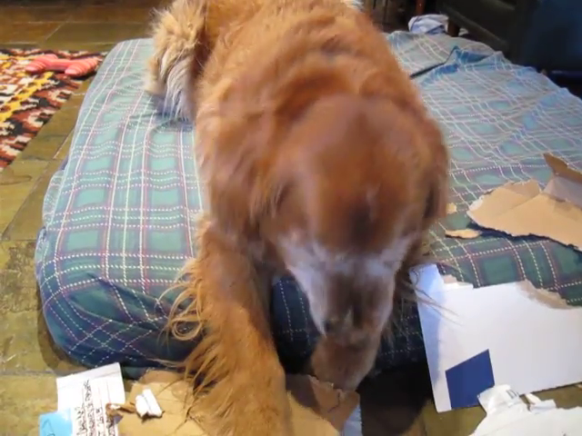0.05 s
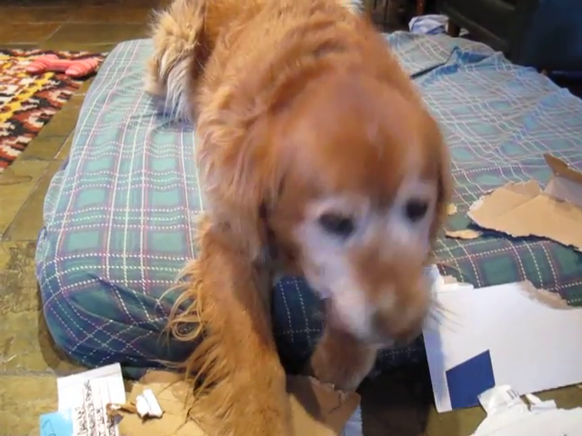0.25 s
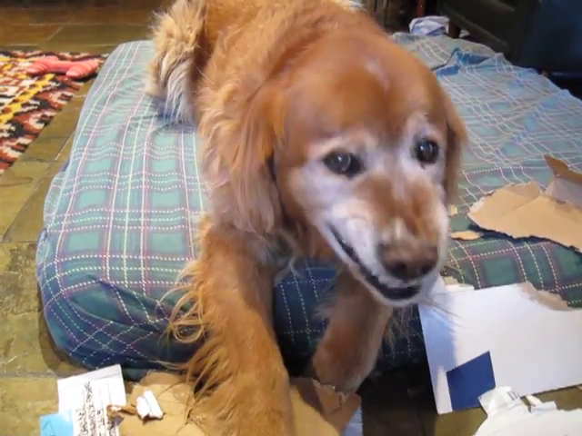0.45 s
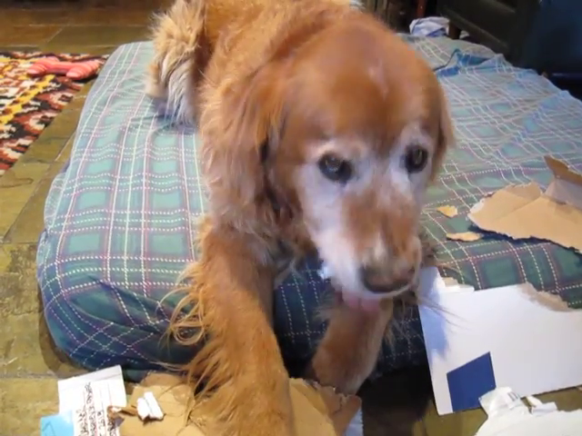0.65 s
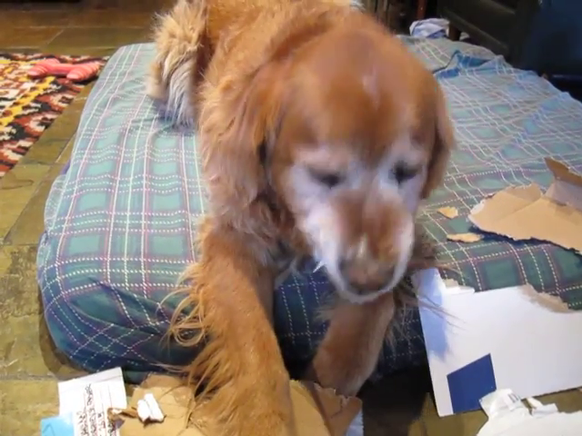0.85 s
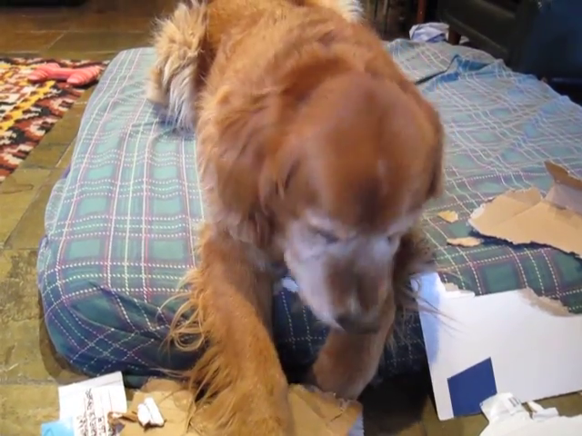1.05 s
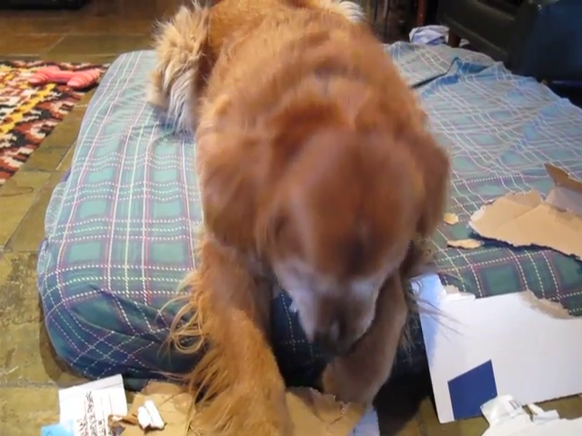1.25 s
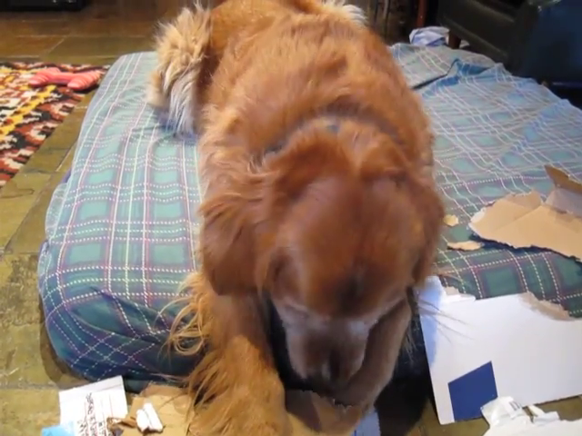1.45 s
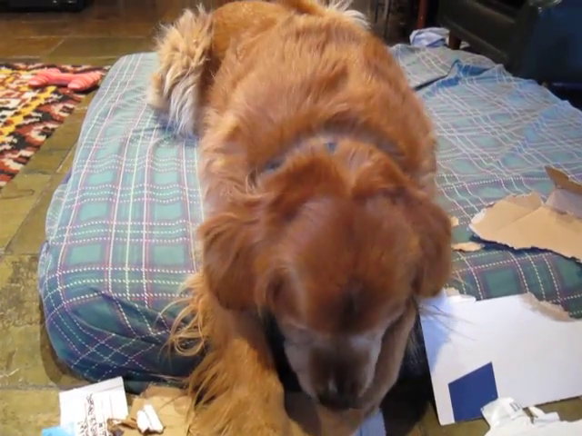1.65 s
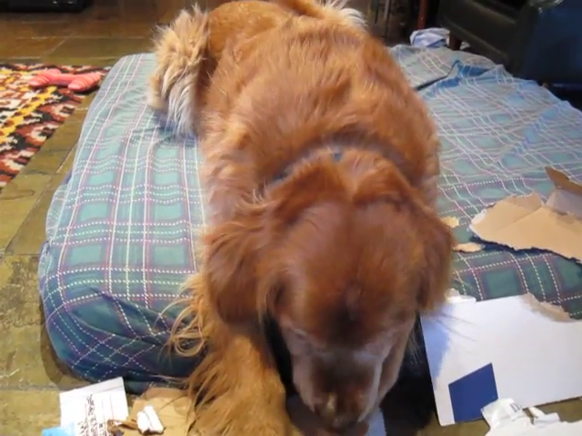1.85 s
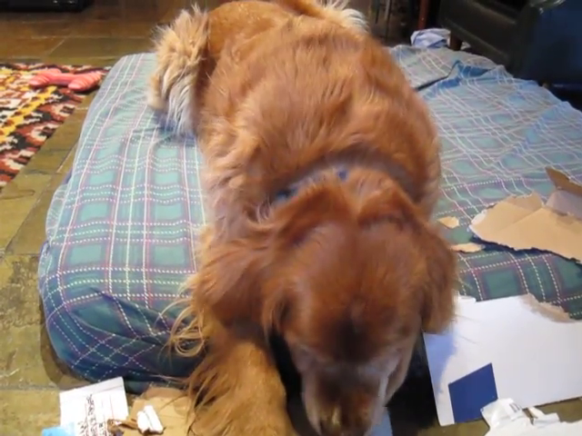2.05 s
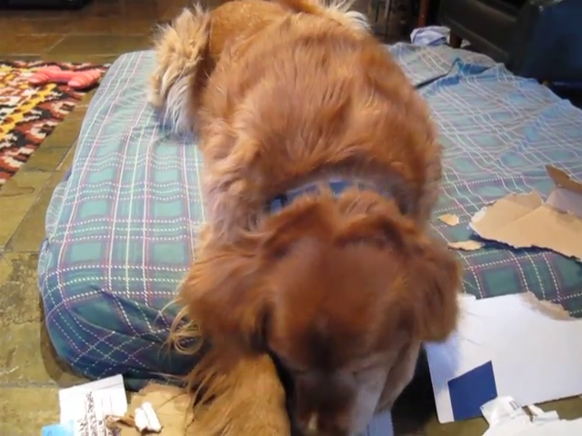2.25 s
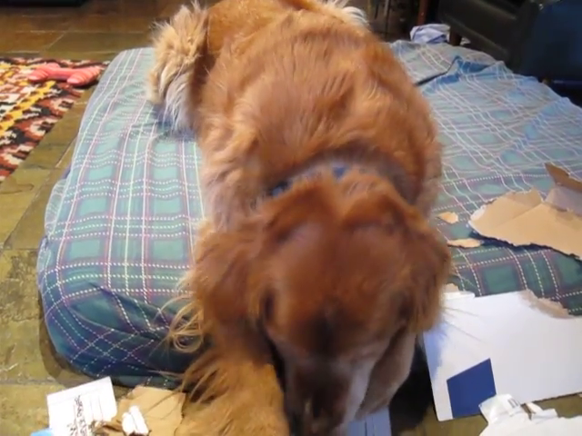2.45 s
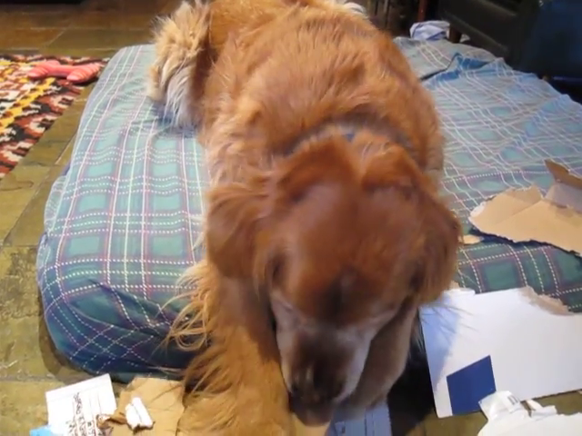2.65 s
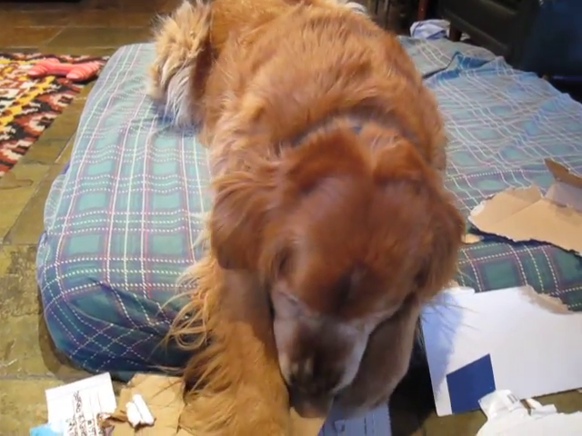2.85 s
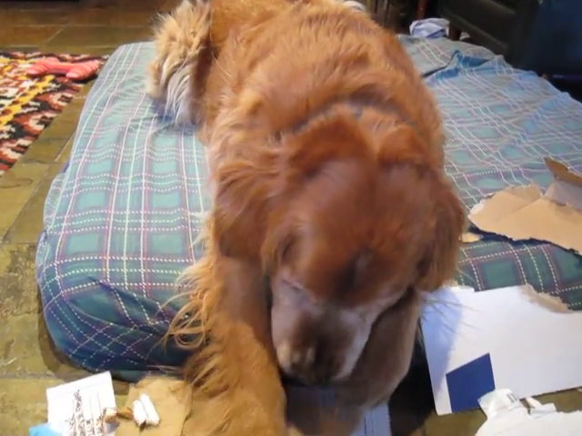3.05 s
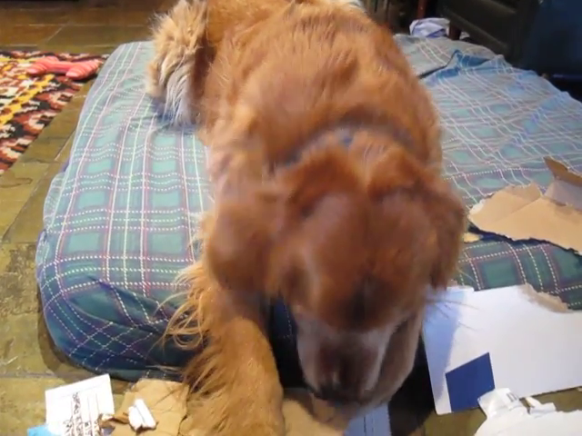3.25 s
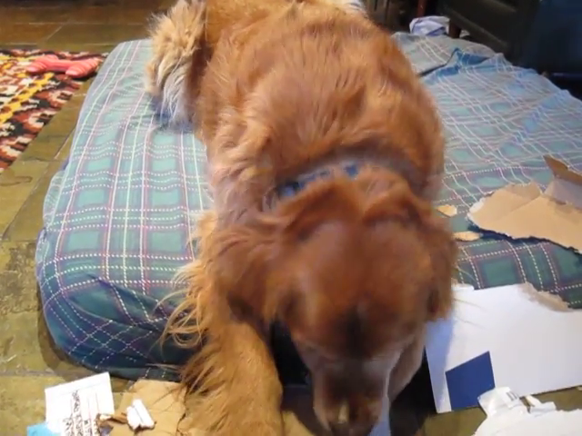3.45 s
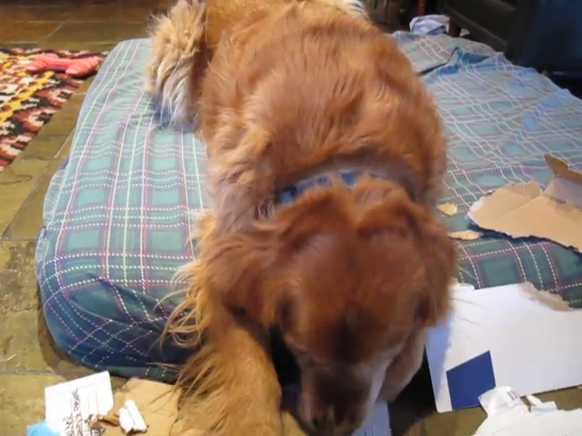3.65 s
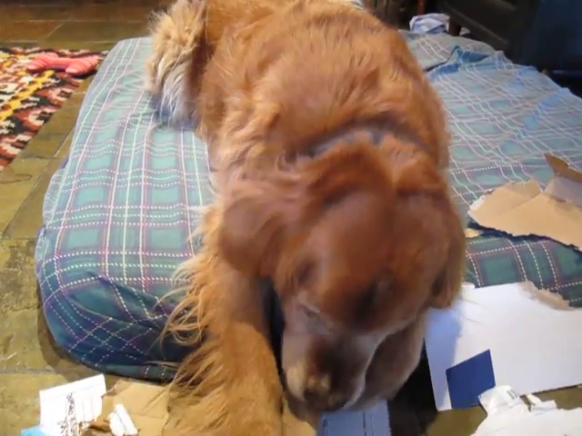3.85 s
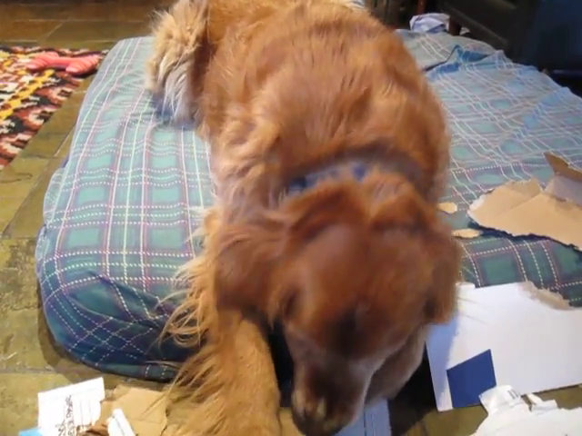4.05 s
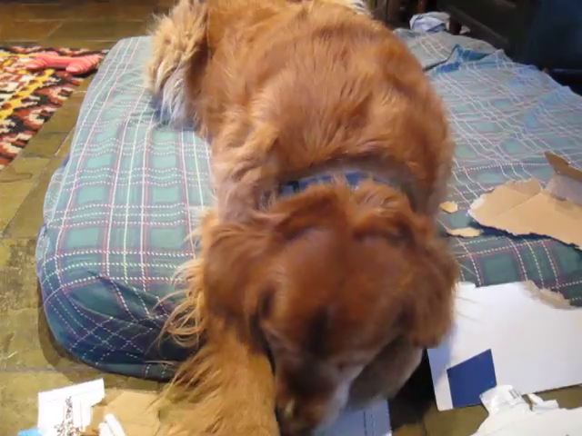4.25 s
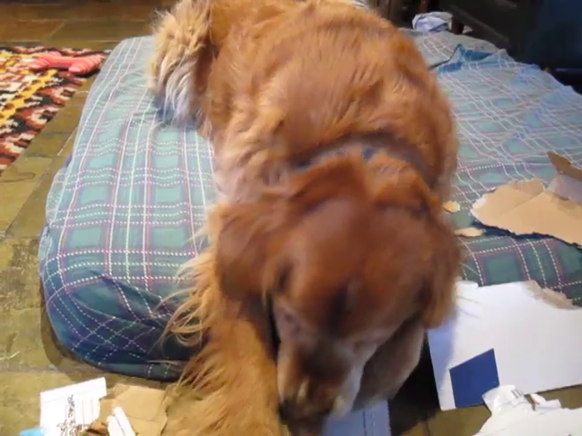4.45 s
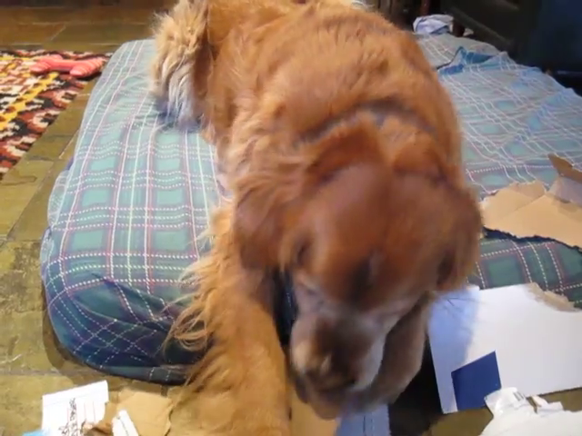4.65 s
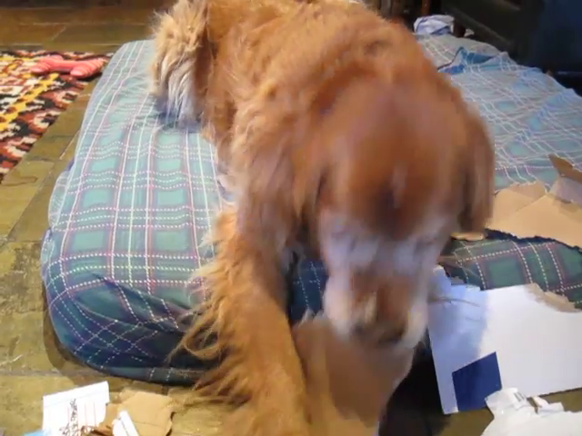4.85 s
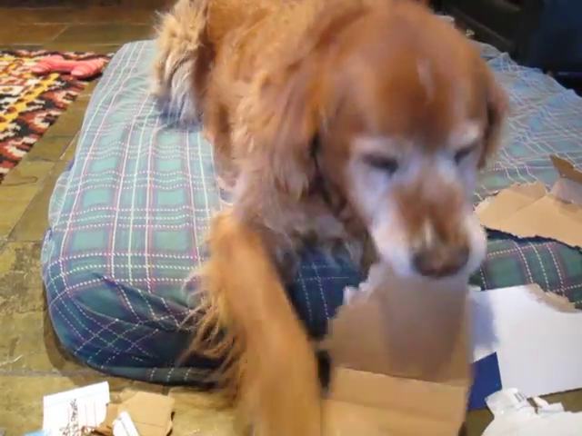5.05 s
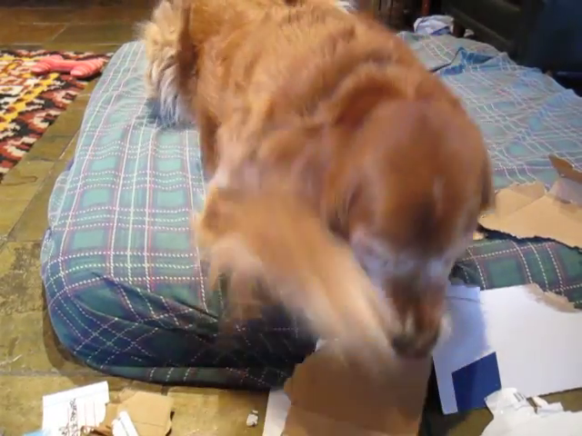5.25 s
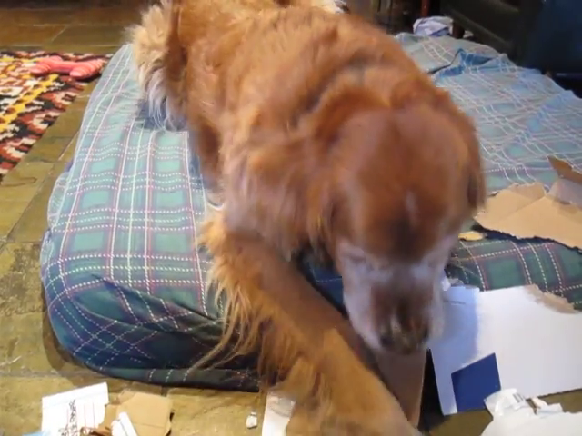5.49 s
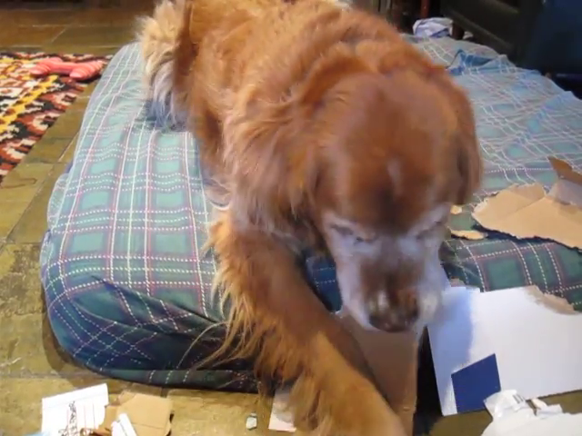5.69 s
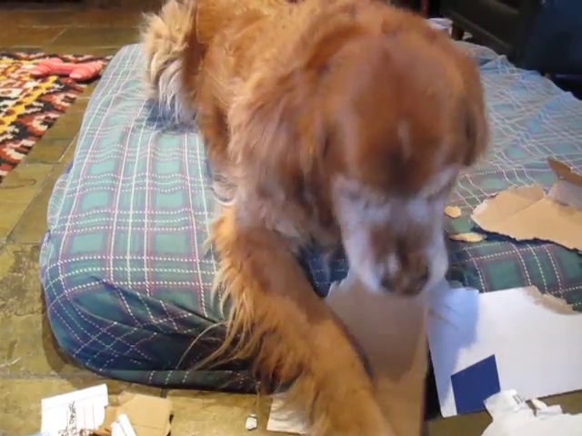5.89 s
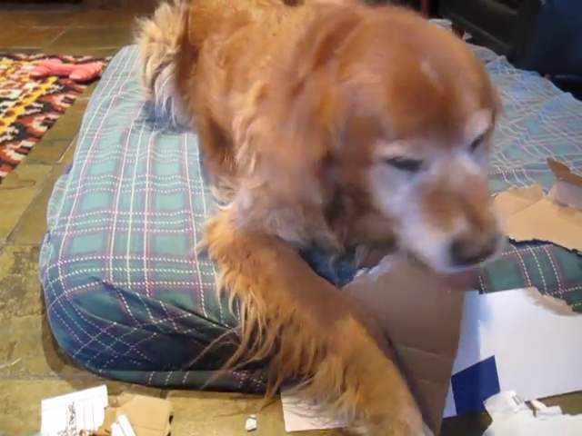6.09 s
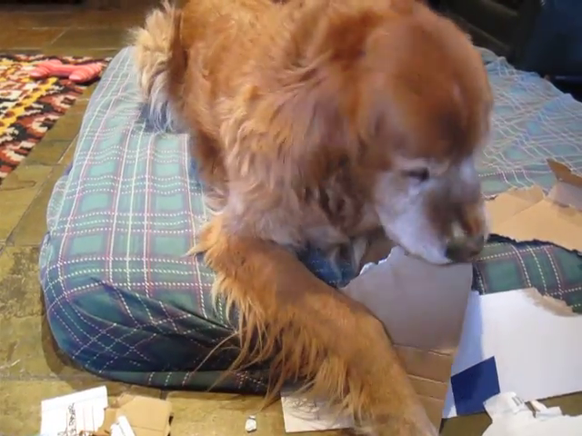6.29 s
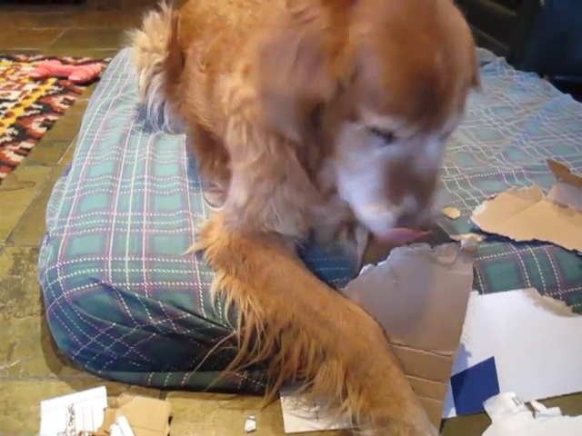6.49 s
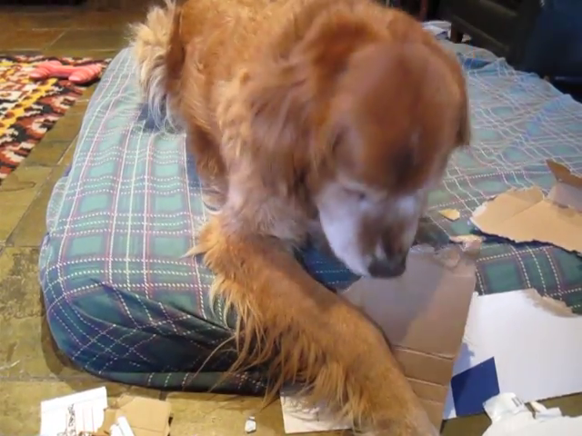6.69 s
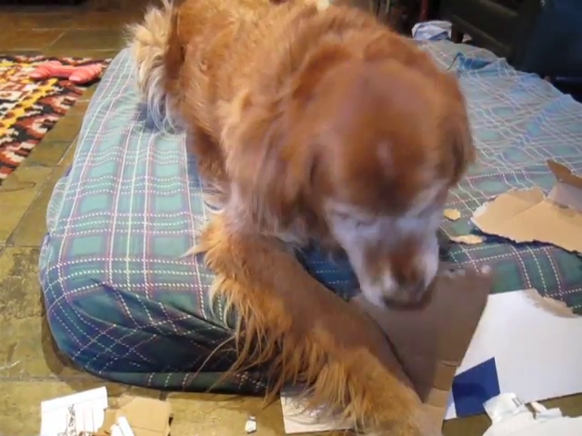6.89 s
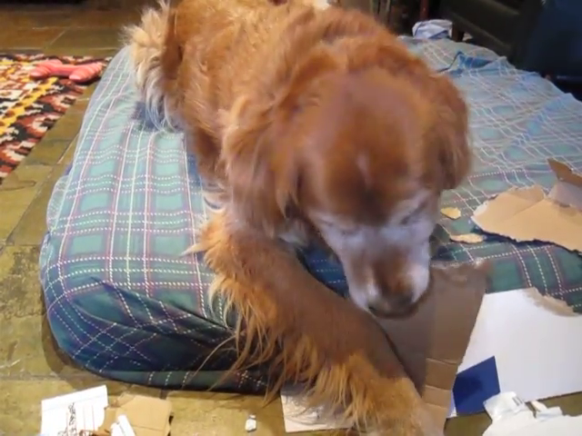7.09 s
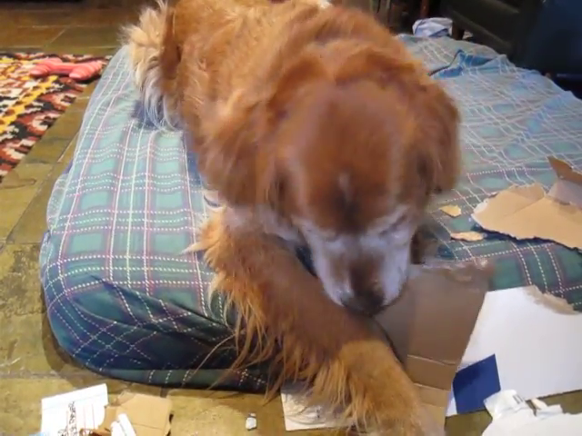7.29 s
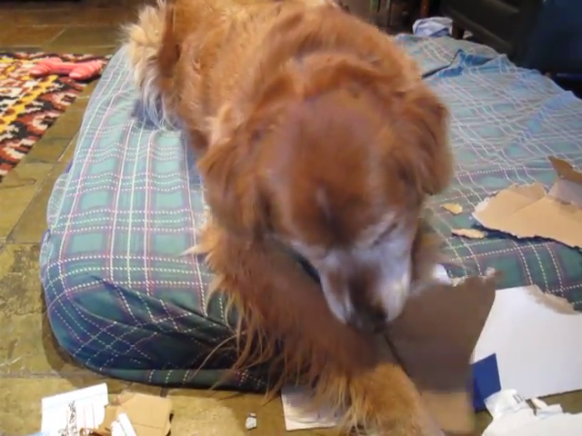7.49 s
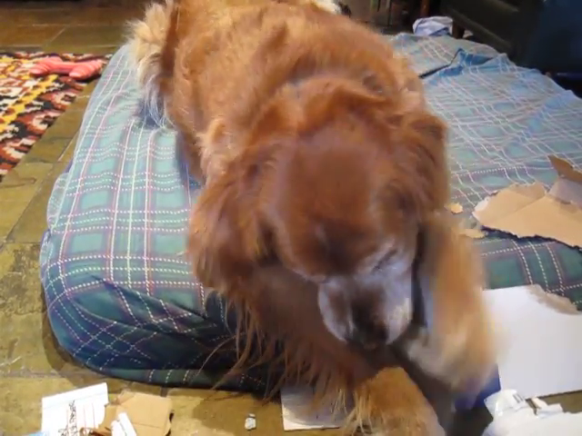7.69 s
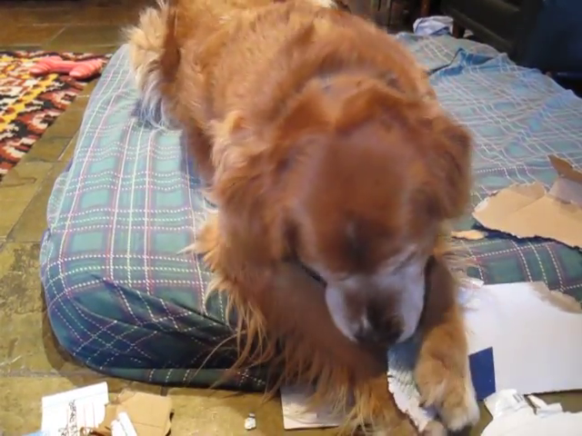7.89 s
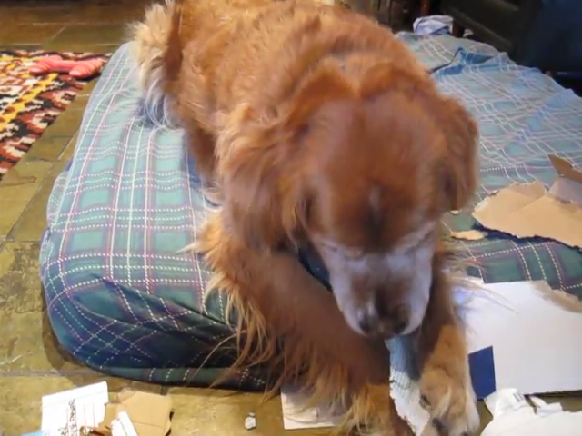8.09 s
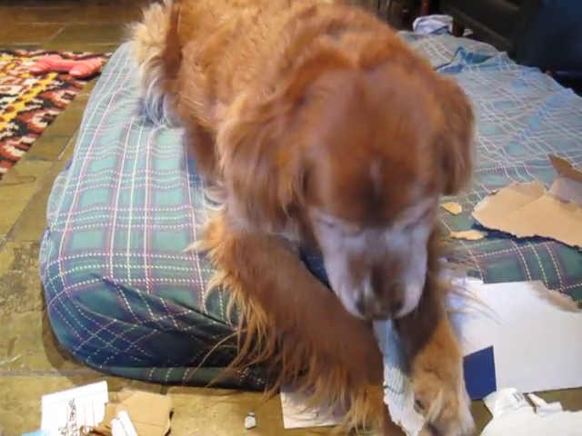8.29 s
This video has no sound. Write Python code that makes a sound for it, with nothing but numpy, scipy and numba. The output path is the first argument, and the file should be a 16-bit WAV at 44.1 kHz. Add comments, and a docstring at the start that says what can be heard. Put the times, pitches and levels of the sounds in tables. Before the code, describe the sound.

Close indoor chewing and tearing of stiff cardboard. Small, bright, irregular crackles lead into a sharp crunch, quieter rubbing, then a dense burst of coarse scraping, woody pops and hard snaps with dull bumps on a soft bed. It drops almost to the hiss, resumes with light creaks, snaps loudly again and ends in dragging, ripping rustle. Short room reflections; low microphone hiss with a barely noticeable thin whine.

```python
"""Dog chewing cardboard, close indoors

A dog on a soft bed chews, tears and drags a sheet of cardboard, a metre from a small camera's microphone.
Swelling noise in the sheet's resonances makes the scraping and tearing, short noise bursts the snaps of
fibres, and damped sines the pops of the sheet and thuds on the bed. The bed echoes snaps and pops,
a noise tail makes the room, and the camera adds shaped hiss with a faint narrow-band whine."""
import sys
import numpy as np
from scipy import signal
from scipy.fft import rfft, irfft
from scipy.io import wavfile
from numba import njit

SR = 44100
rng = np.random.default_rng(int(sys.argv[2]) if len(sys.argv) > 2 else 0)


def nominal_scale(level):
    """Amplitude ratio for a level in decibels (scalar or array-like)."""
    x = np.asarray(level, float) / 20
    return 10 ** x


def wav_out(sig):
    """Save sig, one row per channel (or a flat mono array), as 16-bit PCM at SR to the path in sys.argv[1]."""
    wavfile.write(sys.argv[1], SR, np.round(np.clip(np.atleast_2d(sig).T, -1, 1) * 32767).astype(np.int16))


N = 367353  # length in samples
TIME = np.arange(N) / SR  # s

# Steady hiss of room and microphone: f/Hz, relative level per Hz/dB
HISS_SPECTRUM = [(18, -36), (30, -4.5), (90, 0.5), (437, -2.5), (526, -4.5), (740, -7.5), (1070, 1),
                 (1630, -10), (2750, -7.5), (4650, -11), (5900, -10.5), (12000, -19), (16000, -27)]
# Thin whine under the hiss: f/Hz, rms level/dB
WHINE_LINES = [(5879, -68)]
HISS_DB = -54.5  # rms level of the whole hiss

# Sheet bent and dragged: peak t/s, rise by 20 dB/ms, fall by 20 dB/ms,
# level midway between boom and creak/dB, creak over boom/dB
FLEX_MOVES = [(0.002, 50, 149, -50.5, 0), (0.138, 67, 56, -55.5, 18), (0.188, 20, 64, -58, 20.4),
              (0.406, 225, 65, -51.5, 7), (0.551, 103, 185, -50.5, 7), (0.824, 10, 122, -49, -16.0),
              (1.047, 259, 19, -57.5, 10.4), (1.203, 244, 132, -49.5, 3.4), (1.335, 72, 67, -50, 9.8),
              (1.408, 29, 53, -51.5, 4.3), (1.444, 7, 204, -47, -7.5), (1.667, 161, 118, -56.4, -11.4),
              (1.703, 61, 335, -47.5, 12.5), (1.889, 68, 120, -50.6, -5), (1.981, 31, 351, -47.5, 7.5),
              (2.315, 212, 469, -42.5, 4), (2.607, 138, 76, -35.5, 2.5), (2.661, 39, 185, -35, 2),
              (2.805, 27, 591, -43.5, 2.0), (3.036, 19, 120, -26.5, 3.5), (3.364, 65, 159, -43.5, 2),
              (3.514, 22, 186, -46.4, 6), (3.731, 69, 282, -44.5, 4.2), (3.817, 7, 382, -43.7, 4),
              (4.118, 67, 97, -53, 3.9), (4.221, 39, 118, -41.5, 4.5), (4.417, 80, 591, -39.3, 2),
              (4.557, 36, 170, -25, 2.6), (4.77, 23, 71, -23.5, -3.5), (4.884, 369, 155, -32.5, 7),
              (5.144, 82, 98, -35, 5.5), (5.329, 6.5, 63, -17.5, 3), (5.43, 111, 67, -26.1, 3),
              (5.502, 50, 52, -25.5, 0.1), (5.57, 100, 87, -26.5, -2), (5.69, 281, 68, -31.5, 1),
              (5.798, 45, 251, -23.5, 2.2), (6.433, 206, 190, -56, 2), (6.728, 105, 121, -39, -0.2),
              (6.913, 87, 49, -40.0, 0.8), (6.96, 22, 77, -37, 1), (7.156, 74, 33, -47.5, -7),
              (7.272, 369, 27, -49.1, -1.5), (7.349, 96, 190, -46.5, -1), (7.466, 36, 200, -41, 6.5),
              (7.578, 25, 86, -46, -14), (7.703, 43, 206, -25.5, 1.6), (8.055, 143, 146, -32, 8.5),
              (8.228, 156, 223, -35.5, 7.2)]
# Fibres tearing and rubbing: peak t/s, rise by 20 dB/ms, fall by 20 dB/ms,
# level midway between crackle and sizzle/dB, sizzle over crackle/dB
TEAR_MOVES = [(0.002, 50, 46, -49.2, -4), (0.143, 95, 58, -49, -0.4), (0.186, 13, 95, -44.5, -8),
              (0.308, 32, 32, -45, -3), (0.386, 161, 98, -43.5, -3.8), (0.51, 31, 48, -46, -6),
              (0.554, 29, 104, -39, -4), (0.706, 50, 123, -51, 7), (0.777, 31, 31, -53.6, 2.4),
              (0.939, 37, 83, -52, 0.5), (0.993, 24, 89, -44, -5.5), (1.12, 37, 215, -44.1, -2.5),
              (1.333, 41, 54, -50.4, -9), (1.409, 21, 26, -46.1, -0.2), (1.454, 59, 44, -47.5, -8),
              (1.517, 84, 178, -50, 3), (1.726, 124, 292, -46.5, -7), (1.9, 184, 128, -48.5, 2),
              (1.993, 64, 98, -45, 0), (2.071, 82, 148, -47, 0.1), (2.131, 48, 270, -48, 5),
              (2.26, 39, 61, -39, -4), (2.334, 110, 105, -36.5, -9), (2.602, 315, 170, -37.5, -4.5),
              (2.662, 55, 59, -38, -2), (2.723, 70, 61, -36, -2.5), (2.821, 20, 22, -31.5, -3.6),
              (2.893, 231, 35, -46, -6.7), (2.95, 104, 289, -43, -2.9), (3.04, 33, 142, -31.2, -6.9),
              (3.244, 22, 576, -49.3, -7), (3.456, 119, 23, -39.5, 7), (3.554, 146, 161, -45.3, -2.5),
              (3.759, 100, 84, -38, -5.5), (3.819, 2, 85, -36, -5), (3.996, 174, 49, -40.5, -6.5),
              (4.14, 220, 95, -48, -2.5), (4.218, 23, 128, -41, -7.5), (4.425, 79, 93.5, -32.5, -3),
              (4.602, 155, 90, -24, -3.9), (4.781, 248, 82, -30, 0.5), (4.887, 337, 63, -30.7, -5.5),
              (5.141, 348, 92, -38, -2.5), (5.337, 20, 63, -27.5, -9.5), (5.426, 104, 65, -30.0, -10),
              (5.501, 52, 28, -23.5, -6), (5.571, 105, 41, -28.0, 1.5), (5.693, 357, 46, -32.5, -4),
              (5.783, 116, 132, -31, -5), (5.839, 13, 232, -38, -9), (5.952, 117, 224, -32, -0.8),
              (6.373, 77, 67, -53.5, 6), (6.441, 49, 52, -53, -5), (6.555, 49, 279, -53, 3),
              (6.727, 133, 152, -48, -8), (6.896, 105, 98, -42.5, -1.7), (6.96, 17, 77, -44.5, -14),
              (7.101, 28, 280, -47.2, -2.9), (7.225, 129, 114, -47, -0.9), (7.358, 100, 58, -52.5, -4.5),
              (7.474, 38, 139, -35, -3), (7.612, 126, 27, -46.6, -8.6), (7.716, 72, 183, -25.5, -7.5),
              (8.064, 207, 183, -33, 4), (8.222, 138, 296, -30.5, -2.0)]
# Centre pitches of the bent, bitten part of the sheet: t/s, boom f/Hz, creak f/Hz, crackle f/Hz
BEND_PITCHES = [(0.0, 790, 1190, 3330), (0.23, 616, 1200, 4600), (0.37, 840, 1730, 3160),
                (0.42, 802, 919, 4280), (0.51, 716, 1540, 4430), (0.81, 556, 1020, 4240),
                (1.34, 631, 1540, 3570), (1.46, 750, 919, 3960), (1.58, 556, 1400, 4050),
                (2.74, 615, 1480, 3140), (4.82, 590, 1500, 3960), (5.26, 684, 1420, 3440),
                (5.75, 544, 1130, 3800), (6.17, 556, 1580, 3640), (6.22, 590, 1180, 3550),
                (7.54, 584, 1450, 4200), (7.59, 636, 1250, 3220), (8.33, 780, 1140, 4370)]
BEND_RING_DB = -3.5  # against the fixed resonances
BEND_WANDER_OCT, BEND_STEP_S = 0.12, 0.08
# Resonances of the sheet, lowest group to highest, for one filter pass: f/Hz, width/Hz, level/dB
BOOM_MODES = [(200, 61, -9), (310, 120, -5), (490, 151, -0.5), (640, 210, 0.5), (820, 414, -1.5)]
CREAK_MODES = [(1100, 593, -2), (1500, 460, 4), (1947, 1070, -1)]
CRACKLE_MODES = [(2800, 950, -1.9), (3900, 630, 1), (5200, 2600, -3.5)]
SIZZLE_MODES = [(6800, 2970, -1.5), (9400, 1880, 2.5), (11530, 5860, -4)]

# Sharp snaps of fibres and teeth: t/s, direct peak level/dB, centre f/Hz, length/ms, creak peak level/dB
FIBRE_SNAPS = [(.01, -33, 5430, 1.4, -39), (.1396, -29, 4400, 1.5, -31.5), (.152, -28, 5400, 1.7, -43),
               (0.1838, -17, 7500, 1.4, -45), (0.1882, -15, 4900, 3.3, -36), (.2065, -31, 4100, 1.5, -49),
               (.223, -19, 5440, 2.7, -44), (0.2976, -28, 6300, 3.4, -37), (0.3157, -26, 7700, 2.3, -42),
               (0.347, -25, 3440, 1.3, -28), (.3784, -28, 4300, 4.5, -39), (0.448, -23, 5500, 1.1, -52),
               (0.5048, -17, 5000, 1.5, -48), (0.5495, -24, 5930, 1.9, -40), (.555, -20, 7500, 3.6, -35),
               (.5764, -16, 5200, 2, -43), (0.6033, -15, 6240, 0.92, -37), (.7116, -27, 8200, 1, -46),
               (.7802, -29.5, 6100, 2, -53), (.8228, -26.5, 5300, 1.8, -32), (.9289, -23.5, 6500, 2.5, -40),
               (0.987, -19, 6800, 0.96, -40), (.996, -17, 5700, 4.1, -32), (1.013, -19, 5500, 1.9, -49),
               (1.0372, -25, 3280, 4.9, -37), (1.124, -27.5, 4730, 4.2, -31),
               (1.207, -22.5, 7400, 1.1, -34), (1.213, -28, 6900, .73, -43), (1.4064, -20, 3900, 1.2, -36),
               (1.4462, -23, 6550, 1.9, -42), (1.4707, -26, 4500, 0.93, -45), (1.6613, -28, 4530, 1.9, -43),
               (1.9219, -30, 6100, 1.2, -48), (2.0138, -27, 6000, 2.6, -40), (2.11, -25, 6200, 1.5, -43),
               (2.308, -23, 3140, 1.5, -29), (2.313, -18, 3330, 3.9, -38), (2.33, -25, 3700, 1.4, -26),
               (2.3403, -14, 2880, 1.8, -37), (2.3525, -22, 3200, 1.3, -26), (2.371, -24, 5200, 2.1, -30),
               (2.59, -28, 3800, 1.9, -18), (2.6604, -16, 4000, 2, -16), (2.788, -16, 3970, 1.3, -21),
               (2.815, -13, 3900, 3, -14), (2.821, -17, 5740, 2.1, -33), (2.8818, -24, 3430, 1.1, -30),
               (2.8897, -23.5, 6040, 1.8, -29), (3.0303, -10.5, 3000, 4.3, -7), (3.036, -8, 5330, 2.3, -11),
               (3.0868, -24, 3100, 1.9, -30), (3.1496, -24, 5300, 1.5, -53), (3.194, -30, 6200, 1.5, -50),
               (3.2434, -31, 4800, 2.1, -32), (3.4517, -27, 4800, 2.4, -30), (3.4634, -29, 8100, 1.7, -47),
               (3.725, -21, 5800, 3, -32), (3.733, -19, 3800, 1.9, -35), (3.7824, -22, 4180, 4.3, -26),
               (3.7872, -20, 7240, 1.3, -39), (3.8206, -15, 4000, 5.5, -20), (3.8526, -22, 6800, 1.7, -39),
               (4.1598, -31, 5600, 1.5, -48), (4.2231, -15, 4000, 1.7, -24), (4.2542, -28, 4500, 2, -32),
               (4.3335, -26, 6260, 1, -52), (4.421, -15, 4800, 1.6, -34), (4.433, -11.5, 5940, .86, -22),
               (4.5507, -5.5, 4530, 1.1, -8), (4.7658, -12, 5300, 2.1, -19), (4.7767, -12, 6800, 1.4, -23),
               (4.799, -28, 4800, 1.7, -20), (4.8625, -11, 3900, 1.4, -13), (5.0206, -22, 6150, 2.4, -28),
               (5.0813, -15, 6600, 0.87, -24), (5.1293, -17, 2700, 1.8, -6), (5.1467, -18, 5400, 2, -21),
               (5.2827, -33, 4600, 6.2, -27.5), (5.3257, -10, 2970, 1.9, -5), (5.336, 0, 4800, 2.1, 1),
               (5.3463, -14, 3780, 2.9, -24), (5.4768, -3, 3130, 1.6, -9), (5.4995, -5, 3580, 2.3, -20),
               (5.5052, -5.5, 3900, 1.6, -7), (5.658, -10, 7700, 1.4, -30), (5.6798, -19, 4500, 3.5, -28),
               (5.6854, -13, 5200, 3.9, -20), (5.7802, -7, 4800, 0.77, -20), (5.7896, -14, 4500, 1, -22),
               (5.802, -13, 5700, 1.2, -14), (5.8137, -15, 4200, 1.1, -24), (5.837, -21, 3680, 1.5, -7),
               (5.8414, -8, 2800, 1.8, -7), (5.857, -5, 3900, 1.2, -18), (5.9883, -28, 5200, 1.4, -18),
               (6.0227, -33, 4080, 1.6, -21), (6.106, -20.5, 3830, 2.2, -37), (6.437, -23, 6200, 1.5, -40),
               (6.7654, -29, 4930, 0.98, -32), (6.9108, -29, 3500, 1.5, -23),
               (6.9595, -16.5, 3670, 2.3, -19.5), (7.2546, -31.5, 6470, 2.2, -37),
               (7.6513, -10.5, 4940, 2.8, -16), (7.69, -15, 4730, 1.5, -16), (7.718, -4, 4100, 1.3, -18),
               (7.7298, 1.5, 3600, 1.1, -7), (8.0492, -16, 5730, 2.1, -26), (8.0521, -19, 5400, 2.4, -21),
               (8.0687, -17, 4200, 1.6, -18), (8.151, -20, 6100, 2.3, -32)]
SNAP_WIDTH = 1  # band of one filter pass, as a part of its centre frequency
SNAP_PEAK_SHARE = 0.35  # part of its length spent swelling
# Sheet buckling and popping: t/s, nominal level before the bass cut/dB, f/Hz, ring t60/s
SHEET_POPS = [(0.1835, -32.5, 1250, 0.043), (.4108, -33, 880, 0.029), (0.8239, -13, 540, 0.0082),
              (1.404, -37, 695, .025), (1.449, -22, 785, 0.037), (1.661, -23.5, 470, .015),
              (1.718, -36, 533, .025), (1.8838, -26, 510, 0.016), (2.6602, -23, 654, .019),
              (2.6672, -29, 650, 0.023), (2.789, -30, 587, 0.022), (2.8138, -19, 640, 0.024),
              (2.8212, -20, 680, .018), (3.0324, -7.5, 450, 0.03), (3.0466, -18, 465, 0.025),
              (3.071, -17, 674, 0.014), (3.0951, -27, 420, 0.03), (3.3539, -25.5, 490, .022),
              (3.3688, -21.5, 507, 0.018), (3.5274, -34, 980, .02), (3.5507, -32, 1120, 0.019),
              (3.7238, -31, 520, 0.025), (3.7839, -33, 690, .025), (3.8213, -17, 610, .025),
              (4.2213, -26, 1210, .022), (4.5515, -10.5, 420, 0.019), (4.5967, -16.5, 930, 0.041),
              (4.6544, -28, 410, .031), (4.729, -27, 554, 0.032), (4.778, -19, 520, .03),
              (4.8006, -23, 510, .021), (4.9091, -20.5, 705, 0.028), (4.95, -25.5, 412, 0.039),
              (5.0208, -30, 724, 0.018), (5.1291, 0.5, 1170, 0.0047), (5.2838, -26.5, 360, .025),
              (5.3263, -22, 1110, .017), (5.3466, -5, 840, 0.0092), (5.3917, -16.5, 820, .021),
              (5.4306, -13, 533, .025), (5.4761, -6.5, 860, 0.0099), (5.4951, -13, 1000, .023),
              (5.5055, -7.5, 410, 0.02), (5.5733, -13, 710, 0.024), (5.6562, -16, 510, .018),
              (5.6801, -13.5, 485, .039), (5.7722, -28, 557, 0.02), (5.779, -6, 547, 0.032),
              (5.8014, -1, 580, 0.015), (5.8139, -4.5, 510, 0.019), (5.8273, -9.5, 600, 0.026),
              (5.8408, -9.5, 1190, 0.015), (6.023, -20.5, 580, .023), (6.0982, -21.5, 445, 0.024),
              (6.6911, -26.5, 550, .034), (6.7178, -30, 510, 0.023), (6.901, -30, 925, .013),
              (6.9125, -21, 920, 0.015), (6.9606, -14.5, 414, 0.015), (7.3515, -34, 460, .019),
              (7.4633, -31, 900, .027), (7.5124, -29, 467, 0.022), (7.5773, -32, 686, 0.033),
              (7.6551, -15.5, 503, 0.016), (7.6914, -7, 620, 0.011), (7.7197, -9, 724, 0.012),
              (7.7292, 0, 640, 0.0077), (7.9034, -26, 990, .029), (8.0736, -21, 986, 0.051),
              (8.0804, -23, 1110, 0.028), (8.227, -23, 1014, .039), (8.263, -24, 1020, 0.032),
              (8.2814, -22, 1100, 0.024)]
# Heavy blows of paw and sheet on the bed: t/s, level applied to the bed modes/dB
BED_THUDS = [(2.815, -47), (3.032, -43), (3.822, -54), (4.55, -58), (5.126, -41.5), (5.334, -29.5),
             (5.498, -47), (5.681, -41), (5.793, -37), (5.838, -35), (7.73, -32)]
# Damped modes of the bed: f/Hz, relative level/dB, t60/s
BED_MODES = [(106, 0, 0.048), (163, 4, 0.058)]
BED_ECHO_S, BED_ECHO_DB = 0.000865, -26

# Random small ticks and pops: level over the rustle layer below them, spread, typical pitch
TICK_DB, TICK_SPREAD_DB, TICK_HZ, TICK_CREAK_DB = 7.5, 2.5, 4800, 1.5
POPLET_DB, POPLET_HZ, POPLET_T60_S = 7, 620, 0.021

# Decay of the room by band: f/Hz, t60/s
ROOM_DECAY = [(150, 0.83), (600, 0.18), (2000, 0.34), (6000, 0.15), (14000, 0.061)]
# One pitch on which the room lingers: f/Hz, width/Hz, t60/s, level/dB
ROOM_LINGER = (508, 132, 0.04, -1.5)
ROOM_DB = -19.5  # energy of the whole tail against the direct sound
TOP_HZ = 15800  # upper edge of the microphone


def unit(x):
    """Scale to rms 1."""
    return x / np.sqrt(np.mean(x ** 2))


def resonate(x, modes):
    """Sum of band-pass resonances, neighbours in opposite phase."""
    out = 0
    for k, (hz, width, db) in enumerate(modes):
        band = signal.lfilter(*signal.iirpeak(hz, hz / width, SR), x)
        out = out + (-1) ** k * nominal_scale(db) * band
    return out


def add(out, s, sound):
    """Mix a sound in at time s."""
    start = int(s * SR)
    out[start:start + len(sound)] += sound[:N - start]


def camera():
    """Steady hiss of room and microphone, and a whine that wavers as narrow-band noise does."""
    hz, db = np.transpose(HISS_SPECTRUM)
    log_bins = np.log(np.fft.rfftfreq(N, 1 / SR) + 1)
    shape = nominal_scale(np.interp(log_bins, np.log(hz), db))
    out = nominal_scale(HISS_DB) * unit(irfft(rfft(rng.standard_normal(N)) * shape, N))
    for line_hz, line_db in WHINE_LINES:
        whine = resonate(rng.standard_normal(N), [(line_hz, 12., 0)])
        out = out + nominal_scale(line_db) * unit(whine)
    return out


def swells(rows):
    """Gains of a dull and a bright layer: movements rise and fall at steady rates in dB; powers add."""
    grid_s = TIME[::16]
    power = np.full((2, len(grid_s)), 1e-9)
    for s, rise_ms, fall_ms, db, tilt_db in rows:
        ms = 1000 * (grid_s - s)
        drop_db = 20 * np.where(ms < 0, -ms / max(rise_ms, 4), ms / max(fall_ms, 4))
        # half the tilt goes to each layer
        power += nominal_scale(2 * (db - drop_db)) * nominal_scale(np.array([[-tilt_db], [tilt_db]]))
    return [np.interp(TIME, grid_s, gain) for gain in np.sqrt(power)]


def grains(per_s, spread_db, smear_s):
    """Dense small breaks of very unequal size, each a short burst: a loudness contour of rms 1."""
    when, size = rng.random(N), rng.exponential(size=N)
    hits = (when < per_s / SR) * nominal_scale(2 * spread_db * np.minimum(size, 4.5))
    power = signal.lfilter([1], [1, -np.exp(-1 / (smear_s * SR))], hits)
    return unit(np.sqrt(power + 1e-9))


def wander(step_s):
    """A random value that glides to a new level every step; its knots have spread 1."""
    knots = rng.standard_normal(400)
    return np.interp(TIME / step_s, np.arange(len(knots)), knots)


@njit
def sweep(x, hz, width):
    """State-variable band-pass whose centre moves; width is a part of the centre."""
    y, band, low = np.empty(len(x)), 0., 0.
    for i in range(len(x)):
        g = np.tan(np.pi * hz[i] / SR)
        v = (band + g * (x[i] - low)) / (1 + g * (g + width))
        band, low, y[i] = 2 * v - band, low + 2 * g * v, width * v
    return y


def rustle():
    """Dense small breaks shake fibres and sheet over a smooth rub; the bent part of the sheet rings out."""
    gains = [*swells(FLEX_MOVES), *swells(TEAR_MOVES)]
    bend_s, *bend_hz = np.transpose(BEND_PITCHES)
    ringing = nominal_scale(BEND_RING_DB)
    common = grains(per_s=700., spread_db=3, smear_s=.0012)
    # modes, share of common breaks, share of own breaks, moving ring width as part of pitch
    layers = [(BOOM_MODES, .2, .4, .3), (CREAK_MODES, .25, .45, .33),
              (CRACKLE_MODES, .3, .4, .33), (SIZZLE_MODES, .3, .3, None)]
    out = 0
    for k, (modes, shared, own, width) in enumerate(layers):
        local = grains(per_s=300., spread_db=4, smear_s=.002)
        contour = (1 - shared - own) + shared * common + own * local
        drive, rub = rng.standard_normal((2, N)) * contour
        sound = unit(resonate(resonate(drive, modes), modes))
        if k < len(bend_hz):  # the sizzle has no moving ring
            hz = np.interp(TIME, bend_s, bend_hz[k]) * 2 ** (BEND_WANDER_OCT * wander(BEND_STEP_S))
            bend = unit(sweep(sweep(rub, hz, width), hz, width))
            sound = (sound + ringing * bend) / np.hypot(1, ringing)
        out = out + sound * gains[k]
    return out


def small_events(count):
    """Rows of ticks and pops at random moments, their levels following the tearing and bending."""
    tick_s, pop_s = rng.random((2, count)) * N / SR
    size, pitch, length = rng.standard_normal((3, count))
    boom_db, creak_db = 20 * np.log10(swells(FLEX_MOVES))
    crackle_db, _ = 20 * np.log10(swells(TEAR_MOVES))

    ticks = np.c_[tick_s,
                  np.interp(tick_s, TIME, crackle_db) + TICK_DB + TICK_SPREAD_DB * size,
                  TICK_HZ * 2 ** (.35 * np.clip(pitch, -2, 2)),
                  1.7 * 2 ** (.4 * length),  # ms
                  np.interp(tick_s, TIME, creak_db) + TICK_CREAK_DB]
    poplets = np.c_[pop_s,
                    np.interp(pop_s, TIME, boom_db) + POPLET_DB + TICK_SPREAD_DB * length,
                    POPLET_HZ * 2 ** (.4 * size),
                    np.full(count, POPLET_T60_S)]
    return ticks, poplets


def burst(noise, swell_s):
    """Noise that swells fast and dies away; its envelope peaks at swell_s."""
    t = np.arange(len(noise)) / SR / swell_s
    return noise * t * np.exp(-t)


def snaps(rows):
    """A short burst in a band around its own centre, with a duller creak of the sheet with it."""
    out = np.zeros(N)
    noise = rng.standard_normal((len(rows), 2, 768))
    for (s, db, hz, ms, creak_db), (tick_noise, creak_noise) in zip(rows, noise):
        band = signal.iirpeak(hz, 1 / SNAP_WIDTH, SR)
        tick = burst(tick_noise, SNAP_PEAK_SHARE * ms / 1000)
        tick = signal.lfilter(*band, signal.lfilter(*band, tick))
        creak = resonate(burst(creak_noise, 0.00065), CREAK_MODES)
        add(out, s, nominal_scale(db) * tick / abs(tick).max() + nominal_scale(creak_db) * creak / abs(creak).max())
    return out


def ring(hz, t60, size=2048):
    """One damped vibration, peak near 1."""
    t = np.arange(size) / SR
    return np.sin(2 * np.pi * hz * t) * np.exp(-np.log(1000) * t / t60)


def pops(rows):
    """A few cycles of the buckling sheet, which has no bass of its own."""
    out = np.zeros(N)
    for s, db, hz, t60 in rows:
        onset = 1 - np.exp(-np.arange(2048) * hz / SR / 0.063)  # 0.063 of a cycle
        add(out, s, nominal_scale(db) * ring(hz, t60) * onset)
    return signal.sosfilt(signal.butter(2, 260., "high", fs=SR, output="sos"), out)


def thuds():
    None
    out = np.zeros(N)
    onset = 1 - np.exp(-np.arange(2048) / SR / 0.00078)
    thud = sum(nominal_scale(db) * ring(hz, t60) for hz, db, t60 in BED_MODES) * onset
    for s, db in BED_THUDS:
        add(out, s, nominal_scale(db) * thud)
    return out


def room(x):
    """A tail of dense echoes, each band of noise decaying at its own rate."""
    t, tail = np.arange(SR // 3) / SR, 0
    for hz, t60 in ROOM_DECAY:
        band = signal.lfilter(*signal.iirpeak(hz, .7, SR), rng.standard_normal(len(t)))
        tail = tail + band * np.exp(-np.log(1000) * t / t60)
    hz, width, t60, db = ROOM_LINGER
    linger = resonate(rng.standard_normal(len(t)), [(hz, width, db)])
    tail = tail + linger * np.exp(-np.log(1000) * t / t60)
    tail = tail * np.clip(t / 0.0068 - .6, 0, 1)  # the first walls answer late
    return signal.fftconvolve(x, tail / np.sqrt(np.sum(tail ** 2)))[:N]


def scene():
    """Direct sound, its quick bounce off the bed, the room and the camera."""
    ticks, poplets = small_events(count=250)
    hits = snaps([*FIBRE_SNAPS, *ticks]) + pops([*SHEET_POPS, *poplets]) + thuds()
    hits = hits + nominal_scale(BED_ECHO_DB) * np.roll(hits, int(BED_ECHO_S * SR))
    dog = hits + rustle()
    return (dog + nominal_scale(ROOM_DB) * room(dog) + camera())[None]


def low_pass(x):
    """Removes everything above the highest recorded frequency."""
    return signal.sosfilt(signal.butter(12, 17000, fs=SR, output="sos"), x)


def record(dry):
    """The microphone drops the very top, and the loudest peaks are rounded off."""
    soft = signal.sosfilt(signal.ellip(8, .2, 45, TOP_HZ, fs=SR, output="sos"), dry)
    mix = np.tanh(1.088 * soft) / 1.14
    return low_pass(mix)


dry = scene()
out = record(dry)
wav_out(out)
```